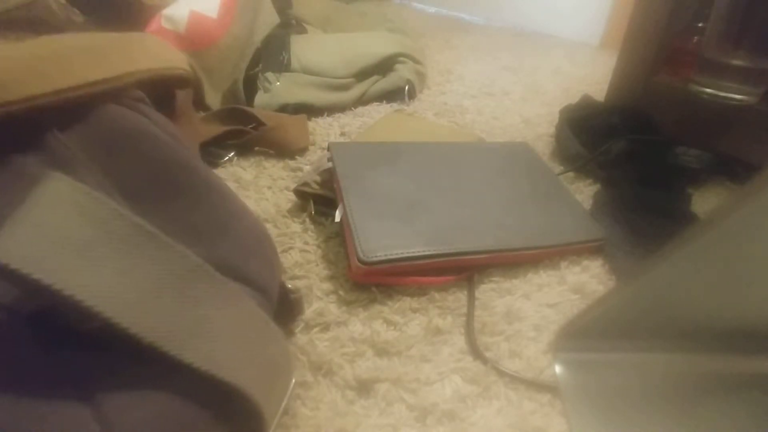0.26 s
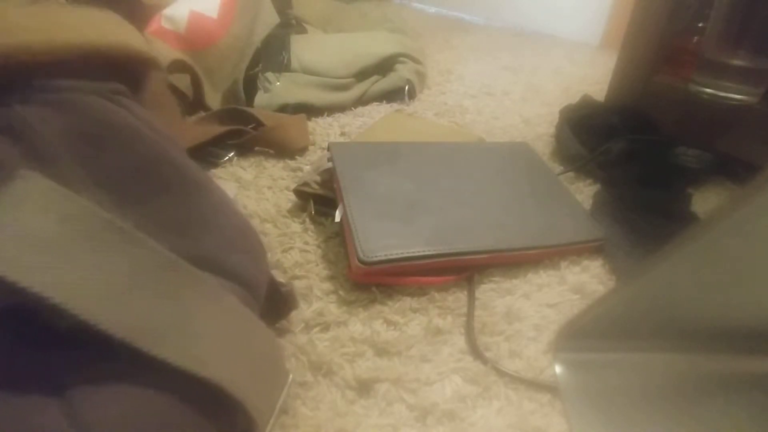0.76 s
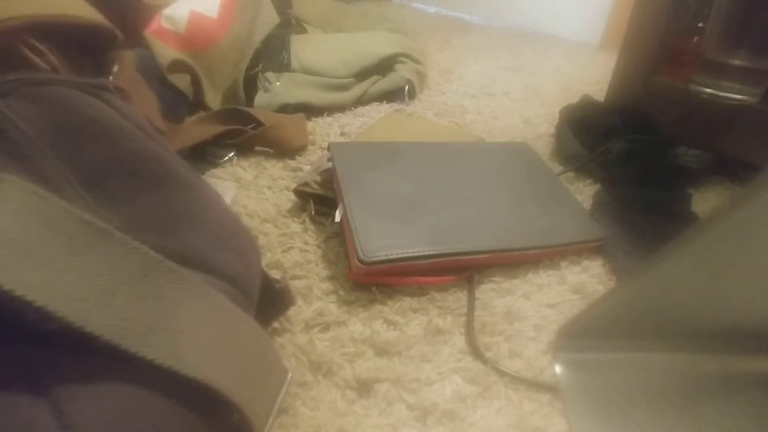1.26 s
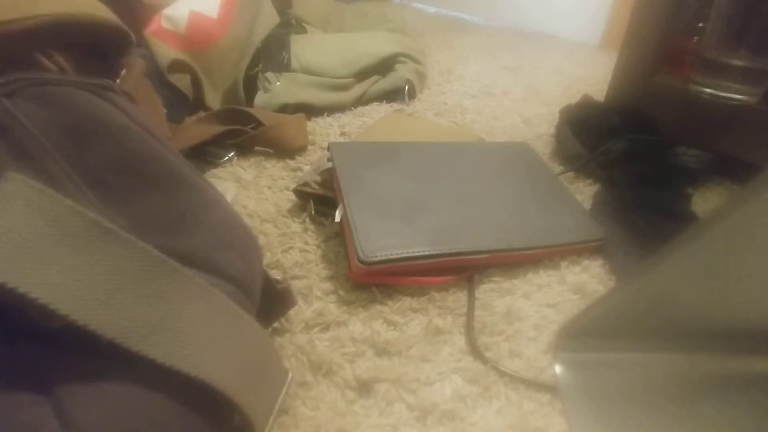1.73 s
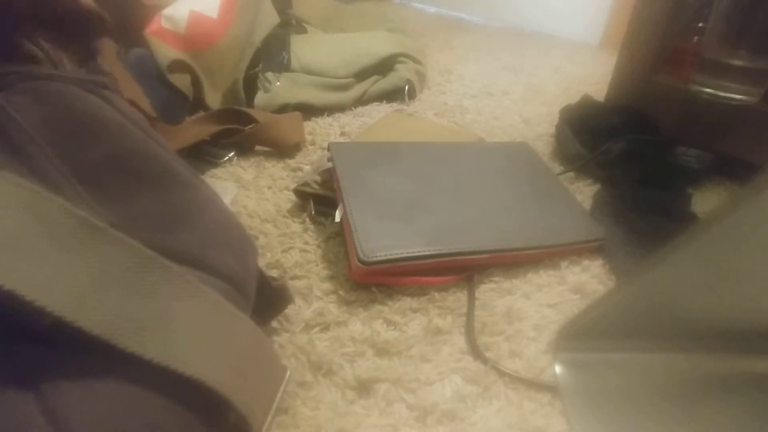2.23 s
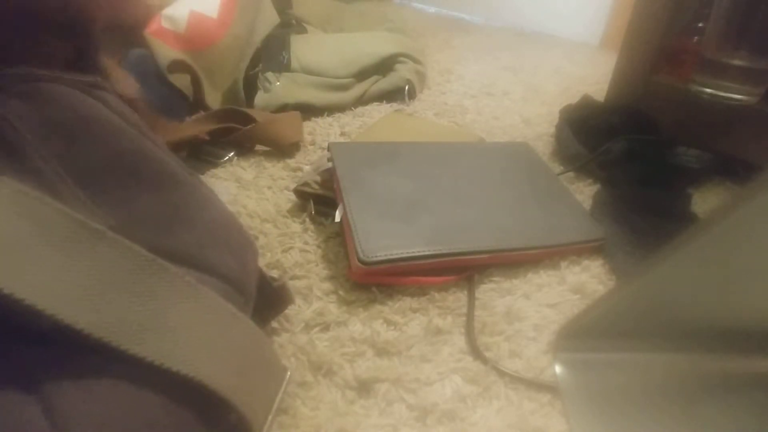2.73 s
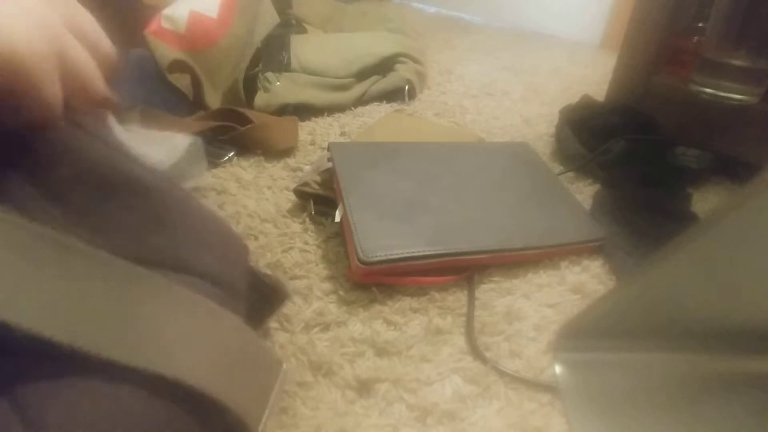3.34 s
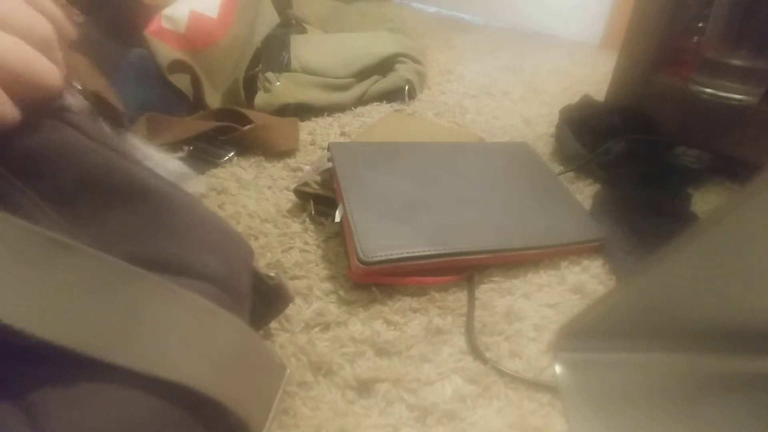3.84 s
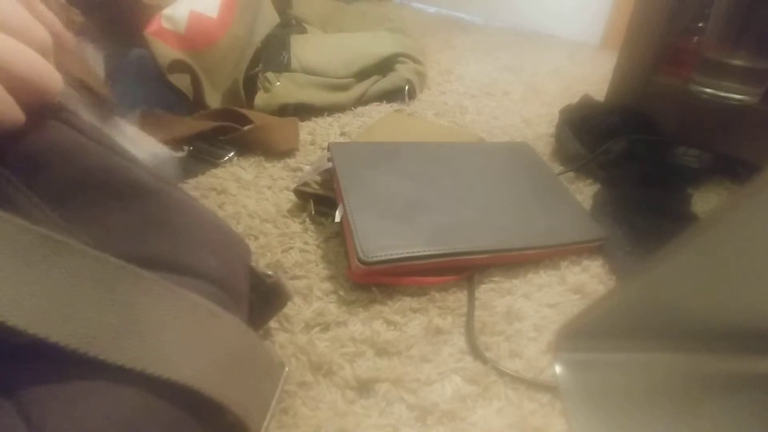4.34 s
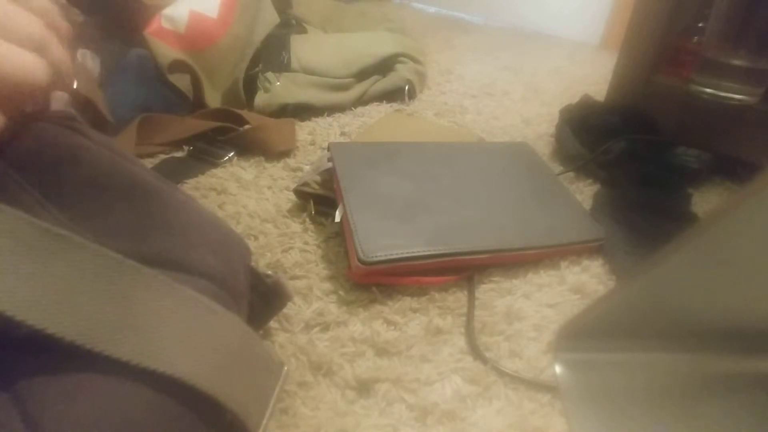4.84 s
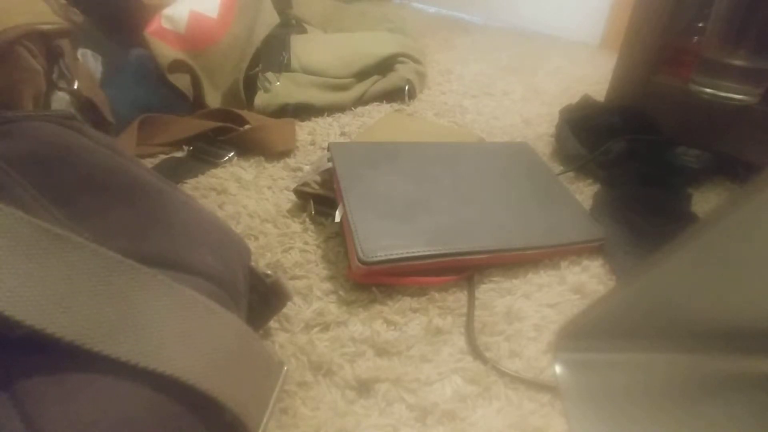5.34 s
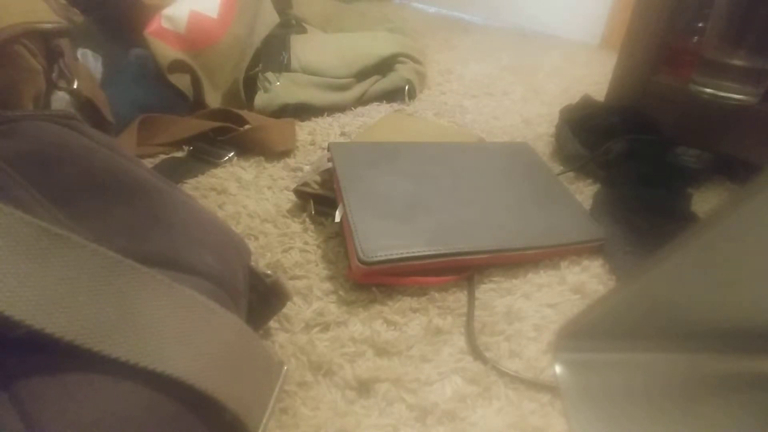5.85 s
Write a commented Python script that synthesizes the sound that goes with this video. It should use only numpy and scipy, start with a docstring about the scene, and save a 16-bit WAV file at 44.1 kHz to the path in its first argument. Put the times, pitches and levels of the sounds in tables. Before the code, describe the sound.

Close zipping on a cloth bag: short buzzing rasps, one fast and long, between soft rustles, small metallic clinks and thuds of contents.

```python
"""Hands brush a fabric bag, then pull its zipper in eight short strokes, close to a phone in a small room.
Each passing tooth tugs the cloth panel and clicks in the slider, so the buzz follows the hand's speed.
The third stroke is the fastest; in the later ones the metal pull tab jingles, driven through its modes.
Between strokes cloth noise swells, the slider ticks, the tab clinks and the contents bump.
After the last stroke come a few more ticks, a bump and narrow swishes of a hand over the weave."""
import sys
import numpy as np
from scipy import signal
from scipy.fft import rfft, irfft
from scipy.io import wavfile
from scipy.ndimage import uniform_filter1d, map_coordinates

SR = 44100
rng = np.random.default_rng(int(sys.argv[2]) if len(sys.argv) > 2 else 0)


def materialize(psi):
    """Save the field psi as 16-bit PCM at rate SR to the path in sys.argv[1].

    A 1-D psi becomes a single channel; in a 2-D psi each row is a channel.
    """
    bounded = np.clip(np.atleast_2d(psi).T, -1, 1)
    quanta = np.round(bounded * 32767).astype(np.int16)
    wavfile.write(sys.argv[1], SR, quanta)


N = 268172
TIME = np.arange(N) / SR
MID_SPEED_HZ = 200  # reference tooth rate

# low spectrum of muffled bumps and flexing cloth: (frequency [Hz], level [dB])
BUMP_SPECTRUM = [(30, -50), (75, 0.5), (140, 0), (260, -7), (450, -14.5), (600, -19), (850, -20),
                 (2000, -33), (6000, -54)]


def undb(db):
    """Decibels to gain."""
    return 10 ** (np.asarray(db) / 20)


def unit(x):
    """Scale to rms 1."""
    return x / np.sqrt(np.mean(x ** 2))


def even(x, size=1500):
    """Hold the rms over size samples at 1, leaving single clicks their shape."""
    return x / np.sqrt(uniform_filter1d(x ** 2, size) + 1e-12)


def colour(x, spectrum, size=4096):
    """Minimum-phase filter of unit energy through (Hz, dB) points."""
    hz, db = np.transpose(spectrum)
    grid = np.maximum(np.fft.rfftfreq(size, 1 / SR), 1)
    gain = undb(np.interp(np.log(grid), np.log(hz), db))
    cepstrum = irfft(np.log(gain))
    # folding the cepstrum makes the response causal
    cepstrum[1:size // 2] *= 2
    cepstrum[size // 2:] = 0
    response = irfft(np.exp(rfft(cepstrum)))
    return signal.fftconvolve(x, response / np.linalg.norm(response))[:len(x)]


def lowpass(x, hz):
    """The part of a sound below hz, without delay."""
    return signal.sosfiltfilt(signal.butter(2, min(hz, SR / 3), fs=SR, output="sos"), x)


def fade(t, t60):
    """Decay that loses 60 dB in t60 seconds."""
    return np.exp(-np.log(1000) * t / t60)


def decay(x, t60):
    """Start an exponential decay at each impulse."""
    return signal.lfilter([1], [1, -fade(1 / SR, t60)], x)


def swell(s, half_s):
    """A smooth rise and fall around the time s."""
    return np.exp(-((TIME - s) / half_s) ** 2)


def walk(rate_hz):
    """Smooth random wander of spread 1."""
    size = max(int(SR / rate_hz), 1)
    held = rng.standard_normal(N)[np.arange(N) // size]
    return unit(uniform_filter1d(held, size))


def strikes(times, sizes):
    """Impulses at the given times."""
    out = np.zeros(N)
    at = np.clip(np.round(times * SR).astype(int), 0, N - 1)
    np.add.at(out, at, sizes)
    return out


def scuff(hits, t60):
    """A short burst of friction noise after each impulse."""
    return decay(hits, t60) * rng.standard_normal(N)


def ring(x, modes):
    """Drive a set of damped modes (Hz, dB, t60 s)."""
    t = TIME[:SR // 4]
    response = sum(undb(db) * np.sin(2 * np.pi * hz * t) * fade(t, t60) for hz, db, t60 in modes)
    return signal.fftconvolve(x, response / np.abs(response).max())[:N]


def room_tone(level_db=-64.5, right_db=-5, shared_below_hz=290):
    """Quiet indoor air: the bass is shared by both ports, the hiss is not."""
    # (frequency [Hz], level [dB])
    air_spectrum = [(25, -23), (70, 0), (130, 1), (250, -12), (600, -10), (1300, -17.5), (4000, -20),
                    (6700, -22.5), (7700, -50), (10500, -29.5), (15000, -28)]
    left, own = (colour(rng.standard_normal(N), air_spectrum) for _ in range(2))
    right = own + lowpass(left - own, shared_below_hz)
    return undb(level_db) * np.array([left, undb(right_db) * right])


def cloth(brush_db=4.0, flex_db=-2, rest_brush_db=-81, rest_flex_db=-71.5,
          grain_db=3, patchy_db=2, fidget_db=2):
    """Fibres catch and slip under the hands while the panel flexes."""
    # a hand shifts its hold: (middle [s], half length [s], brushing level [dB], panel flexing level [dB])
    handling = [(.01, 0.056, -86, -58.5), (0.233, 0.11, -71.5, -60.5), (0.584, 0.051, -58, -57.5),
                (0.776, 0.035, -63, -54.5), (0.997, 0.035, -65.5, -54.5), (1.466, 0.043, -68.5, -55.5),
                (2.16, 0.16, -75.5, -73), (2.492, 0.061, -67, -61.5), (2.94, 0.085, -71, -68),
                (3.432, 0.045, -72.5, -62), (3.55, 0.031, -71, -66), (3.721, 0.088, -80.5, -61),
                (3.905, 0.077, -59.5, -55.5), (4.024, 0.021, -67.5, -57), (4.251, 0.055, -68.5, -47),
                (4.636, 0.12, -81, -67.5), (5.225, 0.072, -66.5, -57), (5.317, 0.023, -60.5, -63),
                (5.399, 0.056, -64.5, -95), (5.69, 0.015, -79, -100), (5.804, 0.035, -72, -99),
                (6.0, 0.39, -73.5, -113)]
    # fibre noise: (frequency [Hz], level [dB])
    brush_spectrum = [(150, -14), (500, -2), (1200, -8), (2500, 1.5), (5000, 2.5), (6700, 1), (7700, 11),
                      (9000, 0), (10600, -19.5), (13000, -8.5), (15500, -5.5)]
    fidget = fidget_db * walk(20)
    brush = undb(rest_brush_db + fidget) + sum(undb(db) * swell(s, half) for s, half, db, _ in handling)
    flex = undb(rest_flex_db + fidget) + sum(undb(db) * swell(s, half) for s, half, _, db in handling)

    fibres = colour(rng.standard_normal(N) * undb(grain_db * walk(900)), brush_spectrum)
    dull = lowpass(fibres, 5500)
    bright = fibres - dull
    hiss = unit(dull * undb(patchy_db * walk(9.8)) + bright)
    panel = unit(colour(rng.standard_normal(N), BUMP_SPECTRUM))
    return undb(brush_db) * brush * hiss + undb(flex_db) * flex * panel


def swishes(width=0.12):
    """Skin gliding over the ribs of the weave sings in a band of +-width in log frequency."""
    # (middle [s], level [dB], centre frequency [Hz], half length [s])
    glides = [(0.781, -54, 7440, 0.004), (5.508, -65.5, 3581, 0.065), (5.843, -64.5, 5140, 0.062),
              (6.016, -64, 14400, 0.066)]
    out = np.zeros(N)
    for s, db, hz, half_s in glides:
        edges_hz = np.minimum(hz * np.exp([-width, width]), SR / 2 - 1)
        band = signal.butter(1, edges_hz, "band", fs=SR, output="sos")
        noise = signal.sosfiltfilt(band, rng.standard_normal(N))
        out += undb(db) * unit(noise) * swell(s, half_s)
    return out


def contents(bump_db=-5, bump_t60=0.13):
    """Soft bumps, muffled by the padded wall, and a few hollow knocks of hard things."""
    # contents bump inside the bag: (time [s], level [dB])
    soft_bumps = [(.905, -48), (1.17, -40.5), (1.236, -49.5), (1.38, -39.5), (2.293, -49), (2.487, -38),
                  (2.503, -43), (2.694, -31), (2.765, -37), (3.096, -52), (3.291, -41.5), (3.507, -47.5),
                  (4.186, -46), (4.911, -56.5)]
    # hard things knock together: (time [s], level [dB], pitch [Hz], t60 [s])
    hard_knocks = [(1.174, -45, 433, 0.04), (3.216, -24, 740, 0.017), (3.833, -38.5, 1848, 0.033),
                   (4.244, -53, 1840, 0.095), (4.349, -36, 762, 0.27)]
    s, db = np.transpose(soft_bumps)
    push = uniform_filter1d(decay(strikes(s, undb(db)), bump_t60), size=200)
    rumble = even(colour(rng.standard_normal(N), BUMP_SPECTRUM), size=700)
    knocks = sum(ring(strikes(np.array([s]), undb(db)), [(hz, 0, t60)]) for s, db, hz, t60 in hard_knocks)
    return undb(bump_db) * push * rumble + knocks


def waver(x, depth_samples, rate_hz):
    """Changing contact bends the pitch of a ringing part a little."""
    drift = decay(depth_samples * walk(rate_hz), t60=1.0)
    return map_coordinates(x, [np.arange(N) + drift], order=5)


def rattle(x):
    """The loosely hung pull tab rings in its modes."""
    # (frequency [Hz], level [dB], t60 [s])
    tab_modes = [(4405, -2, 0.035), (4589, 9, 0.017), (9515, 2, 0.037), (13500, -8, 0.065),
                 (14360, 9.5, 0.057), (14888, 7.5, 0.013)]
    return waver(ring(x, tab_modes), depth_samples=0.0011, rate_hz=120)


def hardware(ring_db=0, ring_t60=0.092, click_db=-3, click_t60=0.015,
             clink_db=-2, chatter_db=-20, chatter_t60=0.11):
    """Lone ticks of the slider and clinks of its tab, each with a little chatter."""
    # slider knocks against teeth and tab: (time [s], ringing level [dB], dry click level [dB])
    ticks = [(0.0669, -53.5, -41.5), (0.199, -74, -43), (1.168, -58, -54.5), (1.372, -59, -51),
             (2.735, -47.5, -52), (2.76, -43.5, -45), (3.119, -56, -45), (3.535, -73, -57),
             (3.779, -43.5, -58), (3.946, -49, -47.5), (3.992, -49, -52), (4.226, -41.5, -65),
             (4.491, -40.5, -59), (4.507, -50, -32.5), (4.518, -33.5, -51), (4.903, -88, -54.5),
             (5.421, -51, -46.5)]
    # pull tab swings free and clinks: (time [s], level [dB])
    clinks = [(.976, -43.5), (2.816, -34), (3.378, -55), (3.419, -46.5), (3.992, -48), (4.518, -52.5)]
    # (frequency [Hz], level [dB], t60 [s])
    slider_modes = [(7460, -8, 0.04), (7900, 31, 0.025), (7900, -28, 0.058)]
    # dry click: (frequency [Hz], level [dB])
    click_spectrum = [(200, 23), (900, 23), (2500, 23.5), (4800, 26), (6500, 28), (7900, -46), (10500, 4),
                      (15000, 9)]
    s, ringing_db, dry_db = np.transpose(ticks)
    # cushioned by the tape, the chatter takes a moment to build up
    shake = uniform_filter1d(decay(strikes(s, undb(ringing_db)), ring_t60), size=130)
    body = shake * even(ring(rng.standard_normal(N), slider_modes), size=500)
    click = colour(scuff(strikes(s, undb(dry_db)), click_t60), click_spectrum)

    s, db = np.transpose(clinks)
    swings = strikes(s, undb(db))
    tab = rattle(swings + undb(chatter_db) * scuff(swings, chatter_t60))
    return undb(ring_db) * body + undb(click_db) * click + undb(clink_db) * tab


def pulling(unsteady_db=1.48, panel_hz=168, off_panel_db=-4.5, rasp_db_per_octave=5):
    """The hand's speed sets the tooth rate and, with each pull's force, the strength of tug and rasp."""
    # one curve for each pull: (time [s], tooth rate [Hz])
    speeds = [
        [(0.305, 311.7), (0.329, 395.8), (0.361, 376), (0.425, 250), (0.477, 246.2), (0.503, 85.96),
         (0.565, 71)],
        [(.64, 99.27), (.69, 136.6), (.75, 80.26)],
        [(1.59, 95.47), (1.646, 143.7), (1.686, 160.6), (1.73, 229.4), (1.77, 165.4), (1.812, 284.5),
         (1.894, 476.9), (2.024, 495.8), (2.096, 175.7), (2.14, 110.1)],
        [(2.58, 141.8), (2.65, 249.8), (2.714, 133.2), (2.79, 102.7)],
        [(2.8, 112), (2.895, 78.6)],
        [(3.09, 90.23), (3.18, 109.6), (3.225, 185.4), (3.285, 86)],
        [(3.795, 129.5), (3.91, 90.54)],
        [(4.27, 88.04), (4.33, 98.74), (4.382, 208.8), (4.418, 249), (4.44, 241.2), (4.46, 280.3),
         (4.56, 114.6)],
    ]
    # the same pulls in order: (attack [s], release [s], tug on the cloth [dB], rasp of the slider [dB],
    # growth of the rasp over the pull [dB], friction hiss [dB], snagging at mid speed [share of a tooth])
    pulls = [(0.037, 0.031, -40, -43.5, 6, 5, .045), (0.085, 0.052, -38.5, -44, -14, -7, 0.164),
             (0.1, 0.15, -37, -46, 14.5, 3, .05), (0.042, 0.028, -42.5, -47, -10.5, 1, .07),
             (0.033, 0.02, -46.5, -49.5, -19, 23, 0.31), (0.022, 0.031, -43, -47.5, 15, 6.5, 0.19),
             (0.031, 0.085, -43, -46, -2, 6.5, 0.8), (0.04, 0.072, -33, -43.5, -5, 4, .05)]
    rate = np.interp(TIME, *np.concatenate(speeds).T)
    spans = np.array([(curve[0][0], curve[-1][0]) for curve in speeds])
    pull = np.maximum(np.searchsorted(spans[:, 0], TIME) - 1, 0)
    start, end = spans[pull].T
    attack, release, tug_db, rasp_db, growth_db, hiss_db, snag = np.array(pulls)[pull].T

    grip = np.clip((TIME - start) / attack, 0, 1) * np.clip((end - TIME) / release, 0, 1)
    grip = grip * undb(unsteady_db * walk(30.025))
    progress = np.clip((TIME - start) / (end - start), 0, 1)
    # the panel follows panel_hz best and loses off_panel_db one octave away
    tug = grip * undb(tug_db + off_panel_db * np.log2(rate / panel_hz) ** 2)
    # faster teeth hit harder
    speed_db = rasp_db_per_octave * np.log2(rate / MID_SPEED_HZ)
    rasp = grip * undb(rasp_db + growth_db * (progress - .5) + speed_db)
    return rate, snag, tug, rasp, undb(hiss_db)


def teeth(rate, snag, wobble=.06, scatter_db=3):
    """An impulse and one swing of the cloth for each tooth; the slower the pull, the more it stumbles."""
    phase = np.cumsum(rate * np.exp(wobble * walk(90))) / SR
    at = np.flatnonzero(np.diff(np.floor(phase)))
    late, size = rng.standard_normal((len(at), 2)).T
    stumble = np.sqrt(MID_SPEED_HZ / rate[at])
    times = np.sort(at / SR + snag[at] * stumble * late / rate[at])
    swing = np.sin(2 * np.pi * np.interp(TIME, times, np.arange(len(at))))
    return strikes(times, undb(scatter_db * stumble * size)), swing


def zipper(tug_db=0, rasp_db=-1, snap_hz=2800, scuff_t60=0.063, slide_db=-4, jingle_db=0,
           patchy_db=3, drag_db=-3, swing_db=0, sway_db=3, buzz_db=2):
    """Teeth tug the panel, click and scrape in the slider, and shake the pull tab."""
    # slider shakes the pull tab: (middle [s], half length [s], level [dB])
    jingles = [(2.77, 0.032, -56), (3.236, 0.018, -45.5), (3.303, 0.054, -67.5), (3.84, 0.055, -62),
               (4.346, 0.022, -50), (4.409, 0.044, -43), (4.501, 0.029, -47)]
    # cloth panel, then slider rasp: (frequency [Hz], level [dB])
    panel_spectrum = [(28, -37), (70, 3), (140, 5), (330, 2.5), (470, -1), (590, -13.5), (760, -12.5),
                      (1200, -16), (4000, -89)]
    rasp_spectrum = [(150, -23), (400, -10.5), (580, 0.5), (760, 10.5), (1000, 8), (1300, -0.5),
                     (2000, 2.5), (3100, -0.5), (4300, -2.5), (6500, -7), (7800, 0), (9200, -16.5),
                     (10600, -36.5), (14500, -20.5)]
    rate, snag, tug_gain, rasp_gain, friction = pulling()
    hits, swing = teeth(rate, snag)
    scrape = even(scuff(hits, scuff_t60))

    # each tooth snaps home with a blunt click; the treble is friction, which changes with the grip
    snaps = undb(buzz_db) * lowpass(even(hits), snap_hz)
    hiss = (scrape - lowpass(scrape, snap_hz)) * undb(patchy_db * walk(25.18))
    slide = undb(slide_db) * rng.standard_normal(N)
    rasp = even(colour(snaps + friction * (hiss + slide), rasp_spectrum))

    # the panel swings once a tooth, unevenly as it tightens and slackens, and rumbles with the drag
    jolts = even(colour(even(hits) + undb(drag_db) * scrape, panel_spectrum))
    swing = lowpass(swing, 180)  # its weight cannot follow the fastest teeth
    sway = undb(swing_db + sway_db * walk(40)) * unit(colour(swing, panel_spectrum))
    tug = even(jolts + sway, size=900)

    shaking = sum(undb(db) * swell(s, half) for s, half, db in jingles)
    jingle = even(rattle(scrape)) * shaking
    return undb(tug_db) * tug_gain * tug + undb(rasp_db) * rasp_gain * rasp + undb(jingle_db) * jingle


def reflections(x, wet_db, t60, low_hz, delay_s):
    """Dense echoes from surfaces, with little bass."""
    t = TIME[:SR // 3]
    tail = rng.standard_normal(len(t)) * fade(t, t60) * (t > delay_s)
    highpass = signal.butter(1, low_hz, "high", fs=SR, output="sos")
    tail = signal.sosfilt(highpass, tail / np.linalg.norm(tail))
    return undb(wet_db) * signal.fftconvolve(x, tail)[:N]


def folds(x, scatter_db, t60, low_hz):
    """Short echoes off the hands and cloth, which change as they move."""
    turn = 2 * walk(6.5)
    shares = (np.cos(turn), np.sin(turn))
    return sum(share * reflections(x, scatter_db, t60, low_hz, delay_s=0) for share in shares)


def scene(left_db=5.0, right_db=-9.5, lag_s=.00043):
    """The bag lies to the left: the right port hears it later and shaded by the phone."""
    # far port: (frequency [Hz], level [dB])
    shade_spectrum = [(100, 9.5), (500, 8), (2000, 3), (4500, -0.5), (8000, -6), (14000, 4)]
    bag = zipper() + hardware() + contents() + cloth() + swishes()
    left = bag + reflections(bag, wet_db=-9.0, t60=0.12, low_hz=436, delay_s=0.0062)
    late = np.roll(bag, int(round(lag_s * SR)))
    shaded = colour(late, shade_spectrum)
    right = shaded + folds(shaded, scatter_db=5, t60=.014, low_hz=1800)
    right = right + reflections(shaded, wet_db=-1, t60=0.089, low_hz=494, delay_s=0.0088)
    return np.array([undb(left_db) * left, undb(right_db) * right]) + room_tone()


def record(dry, bottom_hz=45, top_hz=15800):
    """The deepest bass is taken out, and the phone cuts the top."""
    dry = signal.sosfilt(signal.butter(4, bottom_hz, "high", fs=SR, output="sos"), dry)
    return signal.sosfilt(signal.ellip(10, .2, 70, top_hz, fs=SR, output="sos"), dry)


dry = scene()
out = record(dry)
materialize(out)
```